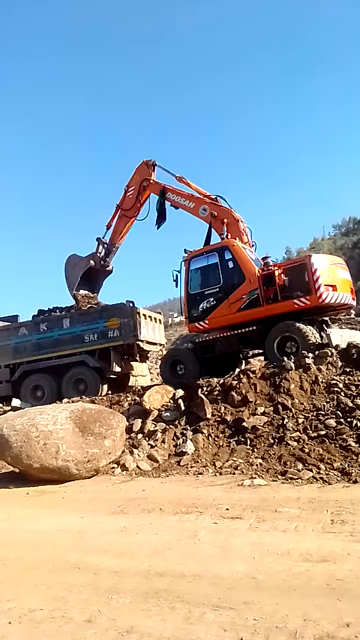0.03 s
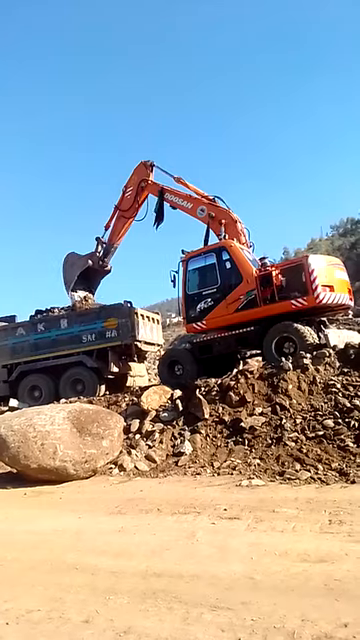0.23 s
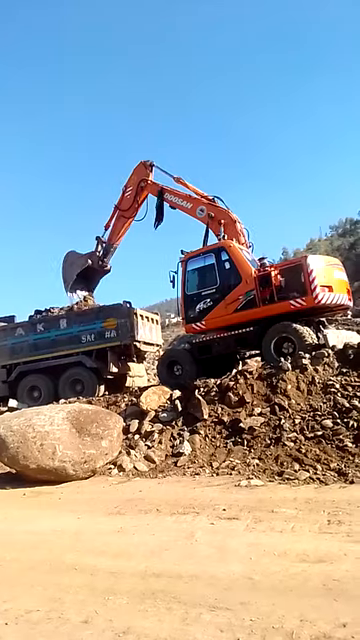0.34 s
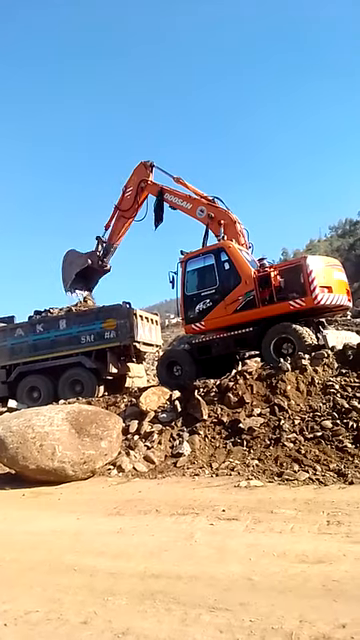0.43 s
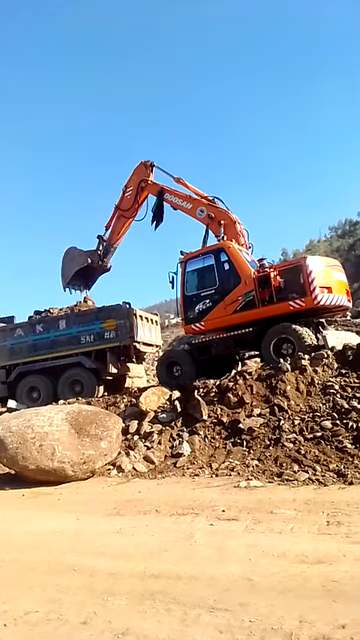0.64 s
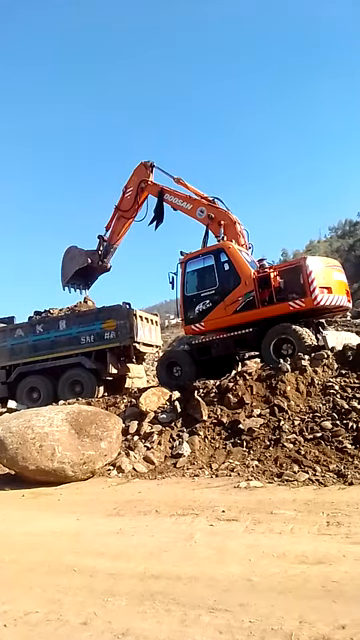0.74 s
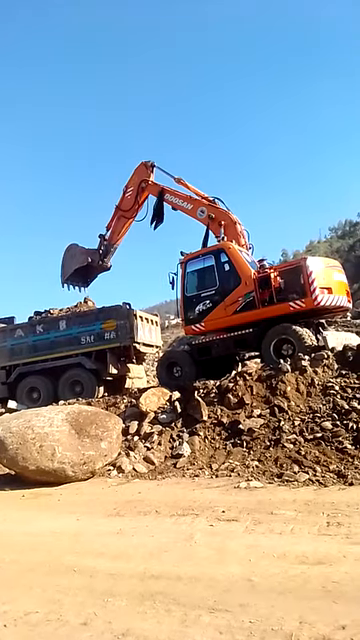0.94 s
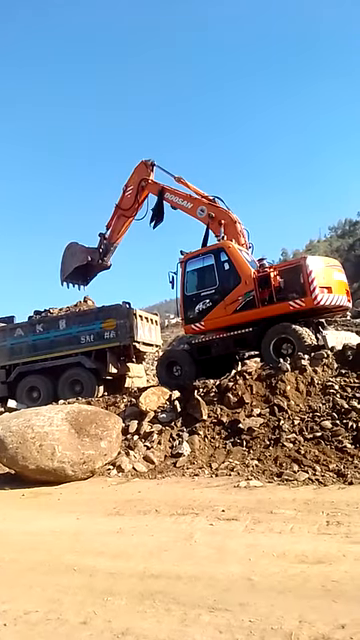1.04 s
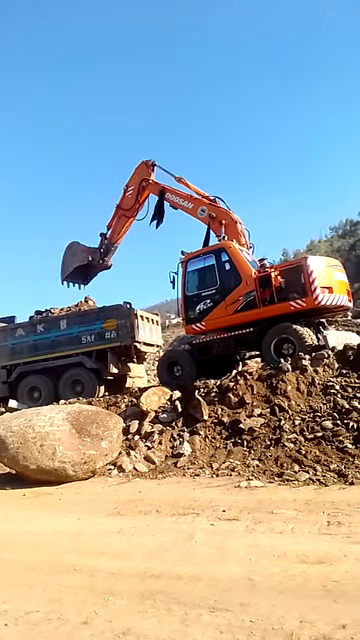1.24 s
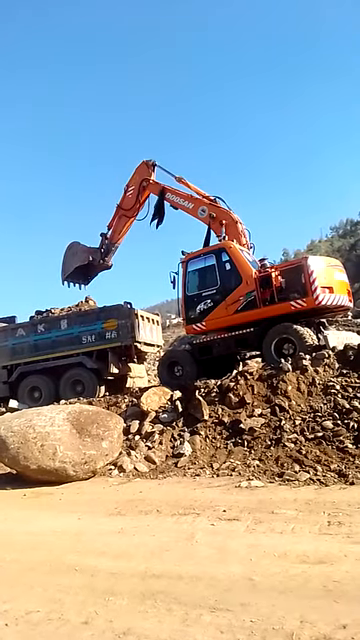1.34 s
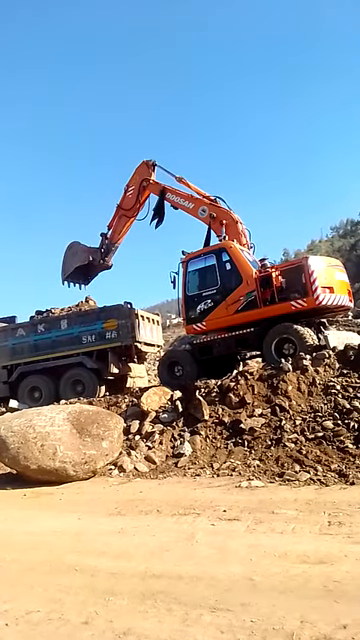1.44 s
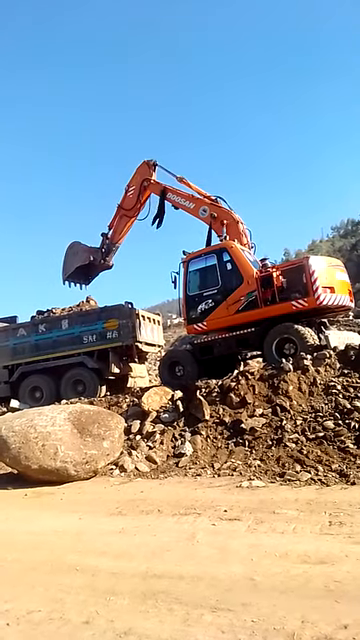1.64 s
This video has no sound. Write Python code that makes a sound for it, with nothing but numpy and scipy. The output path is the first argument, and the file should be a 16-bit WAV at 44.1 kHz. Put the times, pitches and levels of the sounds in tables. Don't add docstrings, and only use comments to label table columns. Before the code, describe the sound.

Stones and earth crash into a metal truck bed, thinning to sparse knocks over faint diesel rumble

```python
import sys
import numpy as np
from scipy import signal
from scipy.fft import rfft, irfft
from scipy.io import wavfile
from scipy.ndimage import uniform_filter1d

SR = 44100
rng = np.random.default_rng(int(sys.argv[2]) if len(sys.argv) > 2 else 0)


def master_out(mix):
    frames = np.transpose(np.atleast_2d(mix))
    ceiling = np.clip(frames, -1, 1)
    pcm = np.round(ceiling * 32767).astype(np.int16)
    wavfile.write(sys.argv[1], SR, pcm)


def level_to_linear(level):
    exponent = np.asarray(level, float) / 20
    return 10 ** exponent


N = 74970
TIME_S = np.arange(N) / SR
LONG_S, SHORT_S = np.arange(SR // 2) / SR, np.arange(SR // 4) / SR
CRACK_RISE_S, MIN_T60_S = 0.00081, 0.02


def evened(x):
    return x / np.sqrt(np.mean(x ** 2) + 1e-20)


def wander(shape, size):
    once = uniform_filter1d(rng.standard_normal(shape), size=size)
    return evened(uniform_filter1d(once, size=size))


def decay(t, t60_s):
    return level_to_linear(-60 * t / t60_s)


def onset(t, rise_s):
    return 1 - np.exp(-t / rise_s)


def coloured_noise(n, points, edge_db=-30):
    hz = np.fft.rfftfreq(n, 1 / SR) + 1
    f, db = np.transpose(points)
    octaves_outside = np.maximum(np.log2(f[0] / hz), 0) + np.maximum(np.log2(hz / f[-1]), 0)
    gain = level_to_linear(np.interp(np.log(hz), np.log(f), db) + edge_db * octaves_outside)
    return irfft(rfft(rng.standard_normal(n)) * gain, n)


def focus(points, hz, lift_db, width_oct):
    f = np.geomspace(points[0][0], points[-1][0], num=90)
    point_hz, point_db = np.transpose(points)
    db = np.interp(np.log(f), np.log(point_hz), point_db)
    hump = np.exp(-.5 * (np.log2(f / hz) / width_oct) ** 2)
    return np.transpose([f, db + lift_db * hump])


def add(mix, s, sound, db):
    part = mix[round(s * SR):][:len(sound)]
    part += (sound * level_to_linear(db) / abs(sound).max())[:len(part)]


# frequency in Hz, level in dB per Hz.
FLOOR_SPECTRUM = [(200, -8.5), (250, 2.5), (320, 2), (450, -13)]
FLOOR_T60_S, BOOM_BLOW_S = 0.3, 0.0072


def floor_boom():
    rumble = coloured_noise(len(LONG_S), FLOOR_SPECTRUM) * decay(LONG_S, FLOOR_T60_S)
    return evened(rumble) * onset(LONG_S, BOOM_BLOW_S) ** 2


# start in seconds, clang level in dB, clang pitch in Hz, boom level in dB.
LUMPS = [(0.218, -20, 810, -46), (0.236, -29, 850, -37), (0.291, -17, 716, -36), (0.348, -17.5, 902, -69),
         (0.386, -15.5, 936, -35), (0.4, -20.5, 680, -48), (0.421, -31, 850, -37), (0.489, -27.5, 660, -36),
         (0.53, -27, 697, -28), (0.57, -19, 754, -56), (0.59, -31.5, 820, -41), (0.638, -60, 840, -32.5),
         (0.681, -27, 805, -53), (0.704, -19.5, 818, -34.5), (0.711, -25, 840, -55),
         (0.727, -18.5, 810, -43), (0.742, -20.5, 795, -45), (0.784, -37, 770, -41),
         (0.858, -25.5, 775, -53), (0.897, -21.5, 1190, -35.5), (0.974, -28, 770, -36),
         (0.999, -42, 894, -41), (1.055, -34.5, 834, -41.5), (1.121, -46, 826, -34.5),
         (1.214, -29.5, 735, -34), (1.243, -23.5, 882, -31), (1.372, -39, 700, -53), (1.461, -72, 692, -60),
         (1.613, -28, 780, -38.5), (1.643, -31, 670, -55)]
# frequency in Hz, level in dB per Hz.
WALL_SPECTRUM = [(380, -7.5), (450, -4.5), (540, -14.5), (680, 3), (850, 3), (1060, -8), (1280, -4.5),
                 (3000, -32.5)]
CLANG_DB, CLANG_T60_S, CLANG_BLOW_S = -4.5, 0.12, 0.0016
RING_DB, RING_T60_S = -9, 0.5
BOOM_DB = -3.5


def lumps():
    out = np.zeros(N)
    fall = decay(LONG_S, CLANG_T60_S) + level_to_linear(RING_DB) * decay(LONG_S, RING_T60_S)
    fall = fall * onset(LONG_S, CLANG_BLOW_S) ** 2
    for s, clang_db, hz, boom_db in LUMPS:
        walls = coloured_noise(len(LONG_S), focus(WALL_SPECTRUM, hz, lift_db=4, width_oct=0.067))
        add(out, s, walls * fall, clang_db + CLANG_DB)
        add(out, s, floor_boom(), boom_db + BOOM_DB)
    return out


# start in seconds, peak in dB, pitch in Hz, t60 in seconds.
CRACKS = [(0.2168, -20.5, 4820, 0.085), (0.2332, -24.5, 5420, 0.092), (0.247, -30.5, 4690, 0.078),
          (0.2612, -32, 4690, 0.092), (0.2735, -29, 3940, 0.043), (0.2911, -17.5, 4780, 0.16),
          (0.315, -20, 4250, 0.044), (0.3391, -23, 4930, 0.22), (0.3487, -20.5, 4540, 0.086),
          (0.3735, -26, 4720, 0.19), (0.3949, -29, 4850, 0.12), (0.4231, -24.5, 4700, 0.13),
          (0.449, -31, 4690, 0.17), (0.5342, -43, 4830, 0.077), (0.5579, -35.5, 3920, 0.2),
          (0.5813, -32.5, 4330, 0.19), (0.616, -31, 4900, 0.041), (0.7106, -21.5, 4050, 0.14),
          (0.7389, -23.5, 4570, 0.075), (0.7869, -22.5, 4300, 0.081), (0.8324, -30.5, 4160, 0.1),
          (0.983, -47, 4700, 0.056), (1.051, -38, 4400, 0.06), (1.2355, -33, 4470, 0.088),
          (1.6131, -41, 4070, 0.19), (1.225, -35, 4360, 0.07)]
# frequency in Hz, level in dB per Hz.
STONE_SPECTRUM = [(1900, -5.5), (3100, -27), (3600, -6), (4300, 1), (5000, -4.5), (5900, -16.5),
                  (6400, -41), (10000, -54)]
CRACK_DB = 1


def cracks():
    out, t = np.zeros(N), SHORT_S
    for s, db, hz, t60_s in CRACKS:
        crumble_db = 1.2 * evened(uniform_filter1d(rng.standard_normal(len(t)), size=80))
        spectrum = focus(STONE_SPECTRUM, hz, lift_db=8.5, width_oct=0.084)
        burst = colour(level_to_linear(crumble_db) * rng.standard_normal(len(t)), spectrum)
        envelope = onset(t, CRACK_RISE_S) ** 2 * decay(t, max(t60_s, MIN_T60_S))
        add(out, s, burst * envelope, db + CRACK_DB)
    return out


def colour(x, points, edge_db=-30):
    hz = np.fft.rfftfreq(len(x), 1 / SR) + 1
    f, db = np.transpose(points)
    octaves_outside = np.maximum(np.log2(f[0] / hz), 0) + np.maximum(np.log2(hz / f[-1]), 0)
    gain = level_to_linear(np.interp(np.log(hz), np.log(f), db) + edge_db * octaves_outside)
    return irfft(rfft(x) * gain, len(x))


def coloured_noise(n, points):
    return colour(rng.standard_normal(n), points)


# frequency in Hz, level in dB per Hz.
SLAB_SPECTRUM = [(1200, -17), (3300, -3), (5500, -3.5), (6500, -20), (9000, -29)]
SNAP_S, SNAP_DB, SNAP_T60_S = 1.2105, -36, 0.12


def slab():
    out, t = np.zeros(N), SHORT_S
    envelope = np.minimum(t / CRACK_RISE_S, 1) * decay(t, SNAP_T60_S)
    add(out, SNAP_S, coloured_noise(len(t), SLAB_SPECTRUM) * envelope, SNAP_DB)
    return out


# start in seconds, peak in dB, pitch in Hz, t60 in seconds.
CLODS = [(0.2161, -32, 2620, 0.15), (0.2255, -38, 2070, 0.13), (.245, -30.5, 2500, .1),
         (.2742, -32.5, 2050, 0.12), (.2971, -31.5, 2370, 0.05), (0.321, -34, 2600, 0.15),
         (0.351, -30, 2300, 0.075), (0.373, -41, 2600, .1), (0.389, -31, 2040, .1),
         (0.422, -38, 2460, 0.043), (0.4525, -32, 1820, 0.046), (.582, -39, 1870, .07),
         (0.7112, -32, 1990, 0.11), (0.714, -28.5, 2800, .05), (.736, -32.5, 2800, .08),
         (.7835, -36.5, 2100, .07), (0.842, -36, 2240, .06), (1.2165, -40.5, 2170, 0.082),
         (1.6218, -37, 1860, 0.066)]
# frequency in Hz, level in dB per Hz.
CLOD_SPECTRUM = [(1500, 7), (2200, 2.5), (2800, -2.5), (3300, -14)]


def clods():
    out, t = np.zeros(N), SHORT_S
    for s, db, hz, t60_s in CLODS:
        burst = coloured_noise(len(t), focus(CLOD_SPECTRUM, hz, lift_db=7.8, width_oct=0.059))
        add(out, s, burst * onset(t, CRACK_RISE_S) * decay(t, max(t60_s, MIN_T60_S)), db)
    return out


# start in seconds, peak in dB, frequency in Hz, t60 in seconds.
KNOCKS = [(1.0495, -35.5, 4740, 0.031), (1.0535, -33.5, 4210, 0.041), (1.24, -40, 615, 0.22),
          (1.228, -33, 793, 0.16), (.2215, -18.5, 813, 0.04), (.2925, -29.5, 714, .05),
          (.388, -22.5, 908, 0.039), (.402, -32, 760, 0.024), (1.255, -39.5, 429.8, 0.31),
          (.617, -38, 810, 0.022), (.6355, -33, 777, 0.099), (.7165, -23.5, 814, 0.03),
          (.7265, -17.5, 817, 0.025), (.7415, -19, 847, 0.039), (.755, -26, 796, .04),
          (.811, -29, 806.5, .12), (.859, -37, 790, 0.061), (.898, -31, 855, .07), (.975, -35, 730, 0.047),
          (.982, -33.5, 883, .04), (.996, -35.5, 780, 0.054), (1.086, -38.5, 713, 0.033),
          (1.122, -42, 812, 0.088), (1.287, -41, 672, 0.11), (1.31, -44, 762, 0.22),
          (1.43, -45, 797, 0.056), (1.622, -37.5, 813, 0.13), (.398, -28, 296, 0.089),
          (1.376, -35, 261, 0.063), (1.462, -44.5, 248, 0.081), (.62, -37.5, 252, 0.061),
          (.655, -36.5, 298, 0.17)]
KNOCK_RISE_CYCLES = 0.99


def knocks():
    out, t = np.zeros(N), SHORT_S
    for s, db, hz, t60_s in KNOCKS:
        envelope = onset(t, KNOCK_RISE_CYCLES / hz) ** 2 * decay(t, max(t60_s, MIN_T60_S))
        add(out, s, np.sin(2 * np.pi * hz * t) * envelope, db)
    return out


# start in seconds, peak in dB, frequency in Hz, t60 in seconds.
PANELS = [(0.6, -31, 860, 0.42), (0.35, -32, 1380, 0.084), (.415, -39.5, 1500, 0.41),
          (0.709, -26.5, 1290, 0.29), (0.97, -25.5, 1260, 0.048), (0.37, -42, 106, 0.23),
          (0.36, -33, 323, 0.034), (0.62, -39, 420, 0.069), (1.245, -40, 930, 0.55),
          (.988, -37.5, 325, 0.11), (1.212, -28.5, 252, 0.29), (1.235, -30.5, 330, 0.19),
          (1.2, -31, 268, 0.63), (1.619, -42.5, 267, 0.13)]
PANEL_WAVER_DB, PANEL_RISE_CYCLES = 2.0, 3.5


def panels():
    out, t = np.zeros(N), LONG_S
    for s, db, hz, t60_s in PANELS:
        waver = level_to_linear(PANEL_WAVER_DB * wander(len(t), 400))
        envelope = onset(t, PANEL_RISE_CYCLES / hz) * decay(t, t60_s)
        add(out, s, waver * np.sin(2 * np.pi * hz * t) * envelope, db)
    return out


# time in seconds, flow in dB.
FLOW = [(.22, -32.5), (.42, -32), (.5, -36), (0.659, -40.5), (.72, -32.5), (.9, -38), (1.0, -45.5),
        (1.2, -50), (1.27, -48.5), (1.45, -50.5), (1.599, -51.5), (1.65, -49.5)]
GRIT_PER_S, GRIT_SPREAD_DB = 1500, 2.5


def grit(follow=1):
    size = level_to_linear(GRIT_SPREAD_DB * np.minimum(rng.exponential(1, N), 5))
    hits = size * (rng.random(N) < GRIT_PER_S / SR) * rng.choice([-1., 1.], N)
    s, db = np.transpose(FLOW)
    flow_db = np.interp(TIME_S, s, db)
    return evened(hits) * level_to_linear(db.max() + follow * (flow_db - db.max()))


def pour():
    chip = coloured_noise(len(SHORT_S), STONE_SPECTRUM)
    chip = chip * decay(SHORT_S, 0.013) * onset(SHORT_S, 0.0066) ** 2
    walls = coloured_noise(len(LONG_S), WALL_SPECTRUM)
    walls = walls * decay(LONG_S, 0.042) * onset(LONG_S, 0.0039) ** 2
    floor = floor_boom() * decay(LONG_S, 0.11)
    out = np.zeros(N)
    for body, db, follow in ((chip, -9.5, 1), (walls, -3, 1), (floor, -10.5, 0.89)):
        out += level_to_linear(db) * signal.oaconvolve(grit(follow), body / np.linalg.norm(body))[:N]
    return out


# start in seconds, level in dB, t60 in seconds.
PUFFS = [(0.215, -70, 0.072), (.233, -76, 0.049), (.293, -66, 0.062), (.312, -70.5, .06), (.3355, -64, .05),
         (.395, -68, 0.094), (0.42, -61.5, 0.062), (.5, -73, .08), (.52, -76, 0.1), (.545, -63.5, 0.17),
         (0.604, -65, 0.19), (0.713, -68, .15), (.7815, -68, 0.054), (1.065, -63.5, 0.097),
         (1.13, -68, 0.11)]
DUST_DB, DUST_RISE_S, DUST_MIN_T60_S, HAZE_DB = 5.5, 0.0032, 0.03, -36.5


def dust():
    power = np.zeros(N)
    for s, db, t60_s in PUFFS:
        t = np.maximum(TIME_S - s, 0)
        puff = onset(t, DUST_RISE_S) * decay(t, max(t60_s, DUST_MIN_T60_S))
        power += (level_to_linear(db + DUST_DB) * puff) ** 2
    haze = level_to_linear(HAZE_DB + np.interp(TIME_S, *np.transpose(FLOW)))
    hiss = evened(coloured_noise(N, [(6500, 10.5), (10000, -2.0), (15500, -3.5)]))
    return hiss * (haze + np.sqrt(power))


# multiple of the pitch, level in dB.
HORN_PARTIALS = [(1, -13.5), (2, 1), (3, -1.5), (4, -15), (5, -15), (6, -8), (7, -24.5), (8, -38),
                 (9, -18.5), (10, -4), (11, -16.5), (12, -8.5), (13, -40), (14, -42.5), (15, -31)]
HORN_START_S, HORN_HOLD_S, HORN_RISE_S, HORN_T60_S = 0.74, 0.17, 0.015, 0.22
HORN_HZ, HORN_SAG_HZ, HORN_DB, FLUTTER_DB = 403.8, 0.37, -38.5, 1.5


def horn():
    t = TIME_S - HORN_START_S
    turns = np.cumsum(HORN_HZ - HORN_SAG_HZ * np.clip(t / HORN_HOLD_S, 0, 2)) / SR
    flutter_db = FLUTTER_DB * wander((len(HORN_PARTIALS), N), 350)
    tone = np.zeros(N)
    for (multiple, db), partial_flutter_db in zip(HORN_PARTIALS, flutter_db):
        phase = 2 * np.pi * (multiple * turns + rng.random())
        tone += level_to_linear(db + partial_flutter_db) * np.sin(phase)
    envelope = np.clip(t / HORN_RISE_S, 0, 1) * decay(np.maximum(t - HORN_HOLD_S, 0), HORN_T60_S)
    return level_to_linear(HORN_DB) * envelope * tone


# frequency in Hz, level in dB, wander in Hz.
EXHAUST = [(78, -61.5, 1.7), (143.9, -58.5, 4.1)]
# time in seconds, exhaust level in dB.
LOAD = [
    (.22, -9),
    (.45, 3.5),
    (1.15, 0.5),
    (1.5, 0),
    (1.7, -23),
]
# frequency in Hz, level in dB per Hz.
DIESEL_SPECTRUM = [(65, -2), (120, 7), (175, -5), (260, 3), (520, -3.5), (760, 2), (1350, -14.5),
                   (3200, -14.5)]
# frequency in Hz, level in dB per Hz.
FAN_SPECTRUM = [(2800, -10.5), (3120, -22), (3600, -6.5), (4200, -1), (4900, -9.5), (5500, -11.5),
                (7400, -28.5), (15500, -35.5)]
DIESEL_DB, FAN_DB = -54, -56.5


def engine():
    out = level_to_linear(FAN_DB) * evened(coloured_noise(N, FAN_SPECTRUM))
    load_db = np.interp(TIME_S, *np.transpose(LOAD))
    for hz, db, wander_hz in EXHAUST:
        pitch_drift, level_drift = wander((2, N), 2500)
        turns = np.cumsum(hz + wander_hz * pitch_drift / 2) / SR
        out += level_to_linear(db + 2.6 * level_drift + load_db) * np.sqrt(2) * np.sin(2 * np.pi * turns)
    gate = 1 + 0.23 * np.cos(np.pi * turns)
    rumble = colour(gate * rng.standard_normal(N), DIESEL_SPECTRUM)
    return out + level_to_linear(DIESEL_DB) * evened(rumble)


def scene():
    impacts = lumps() + cracks() + slab() + clods() + knocks() + panels()
    return (impacts + pour() + dust() + horn() + engine())[None]


def low_pass(x):
    return signal.sosfilt(signal.butter(12, 15730, fs=SR, output="sos"), x)


def record(dry):
    start_s, fade_s, mic_low_hz = 0.2155, 0.0014, 72.5
    gate = np.clip((TIME_S - start_s) / fade_s, 0, 1)
    high_pass = signal.butter(2, mic_low_hz, "high", fs=SR, output="sos")
    return low_pass(signal.sosfilt(high_pass, dry * gate))


dry = scene()
out = record(dry)
master_out(out)
```